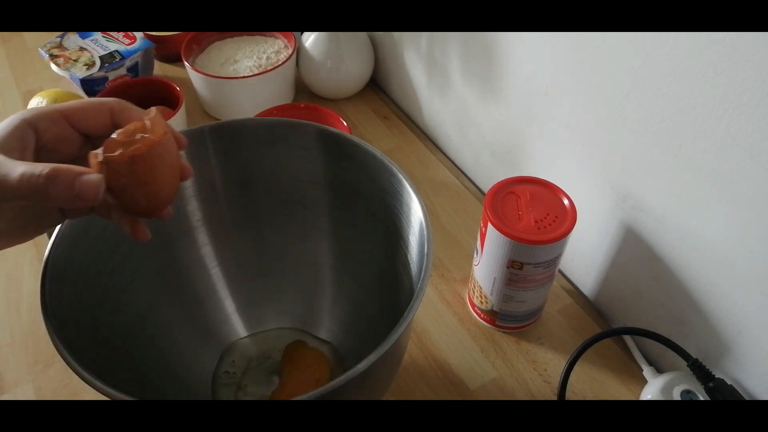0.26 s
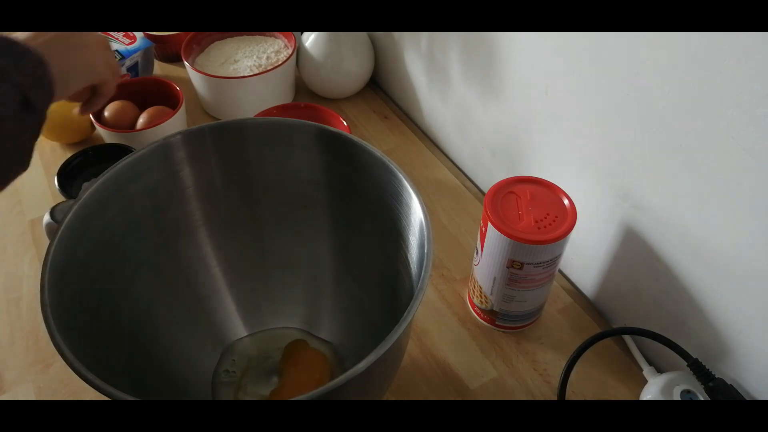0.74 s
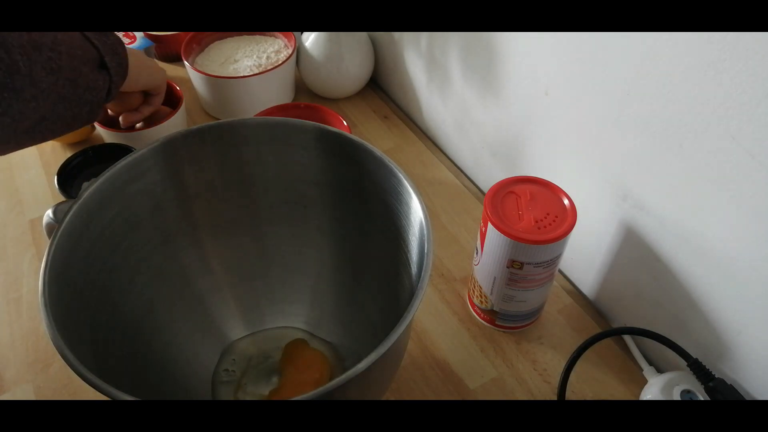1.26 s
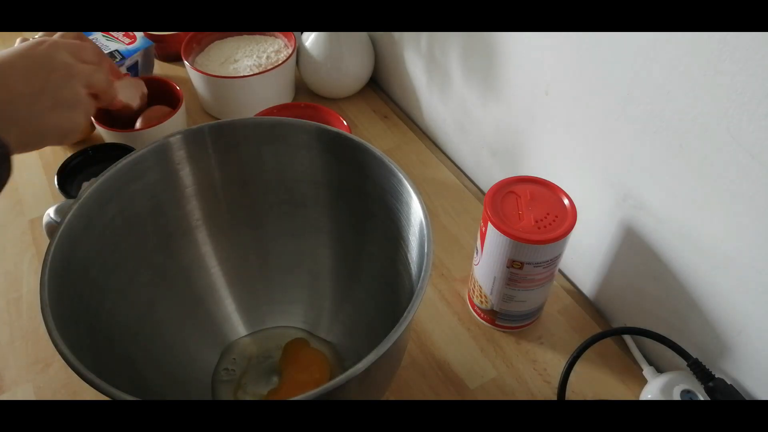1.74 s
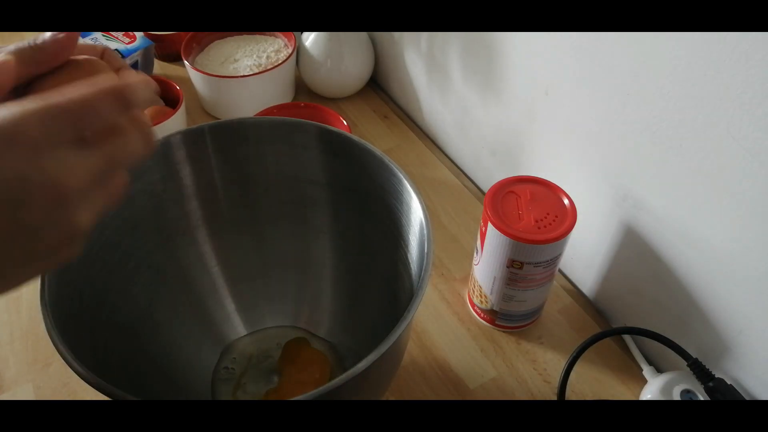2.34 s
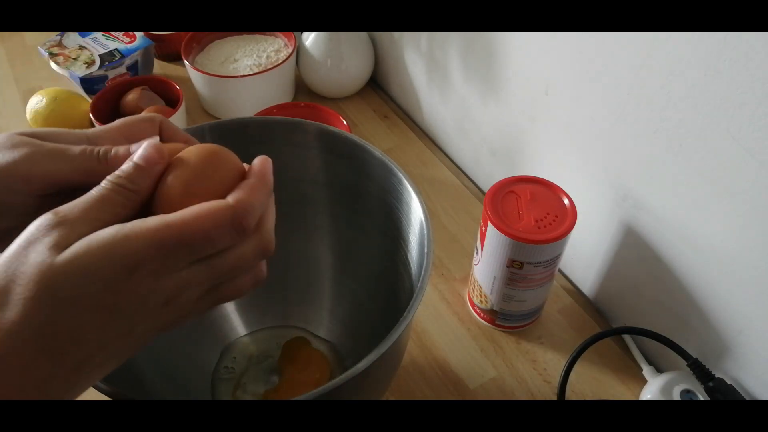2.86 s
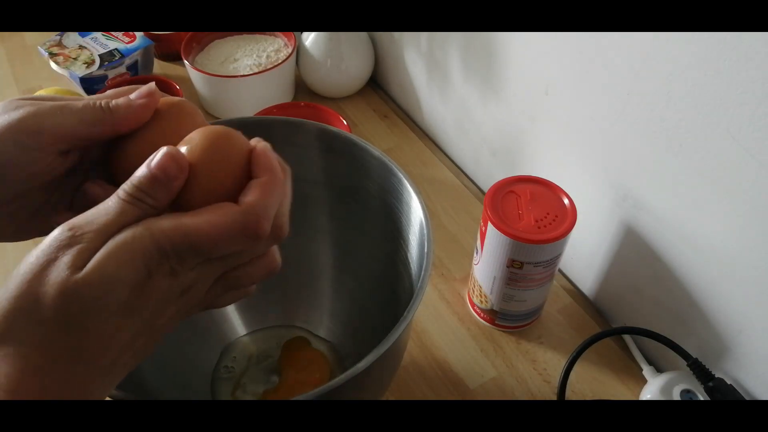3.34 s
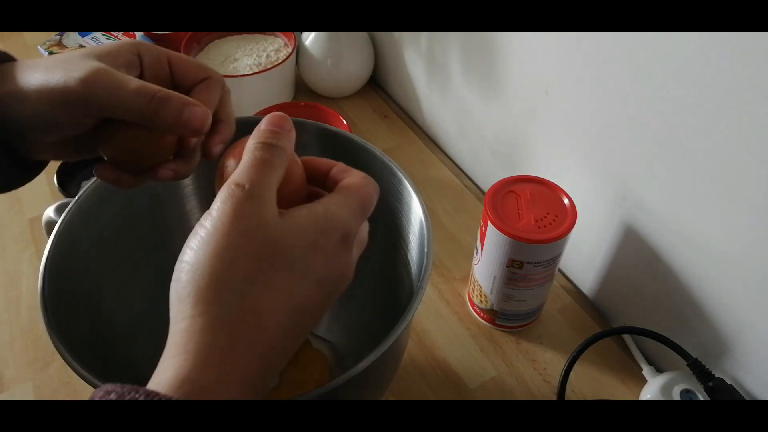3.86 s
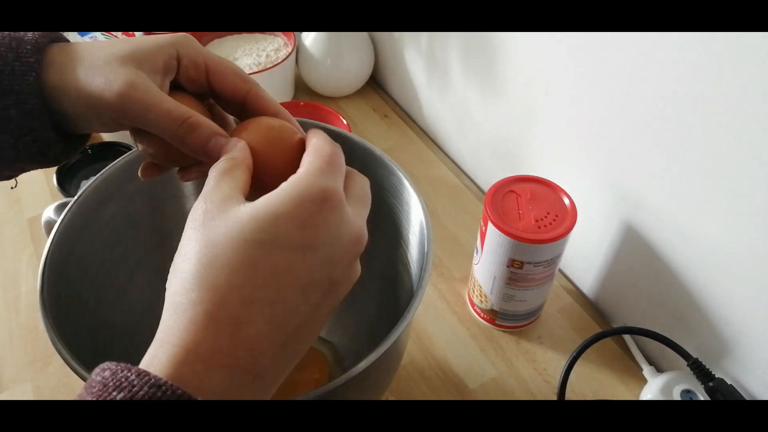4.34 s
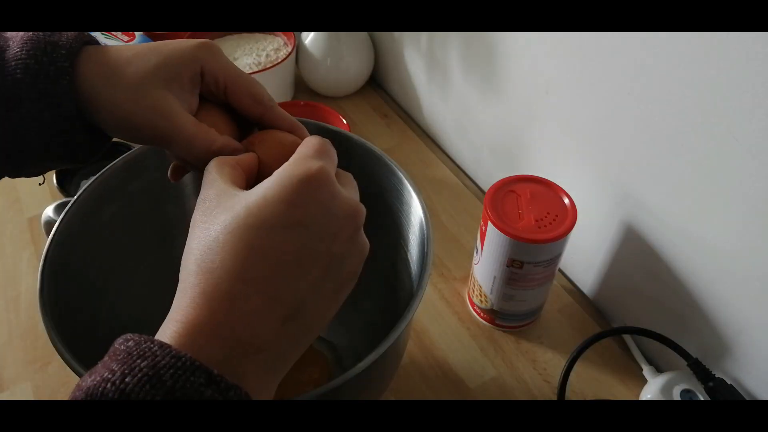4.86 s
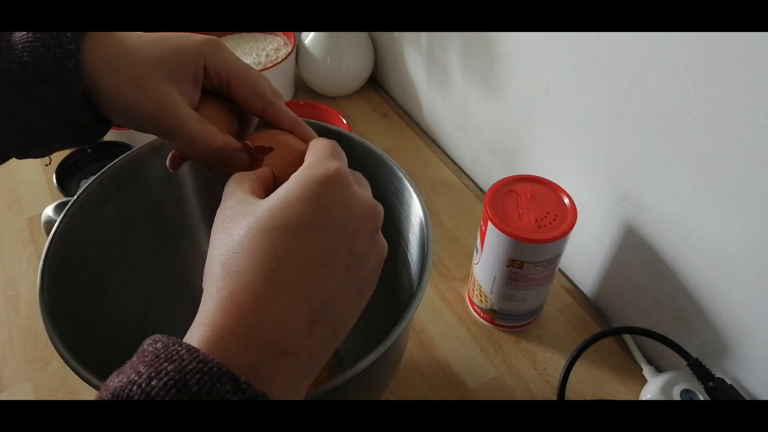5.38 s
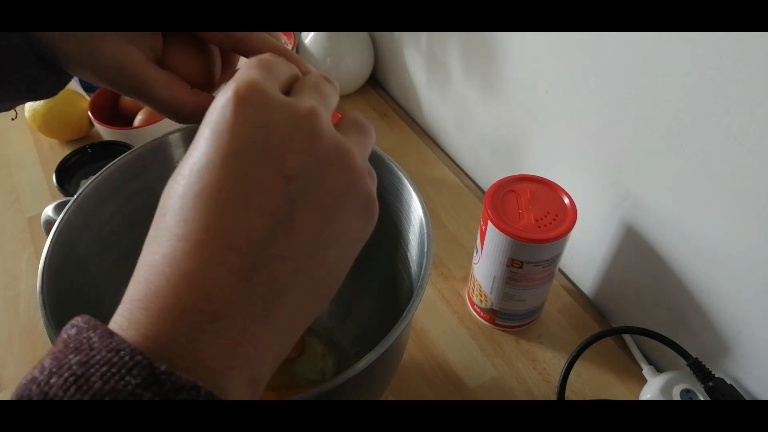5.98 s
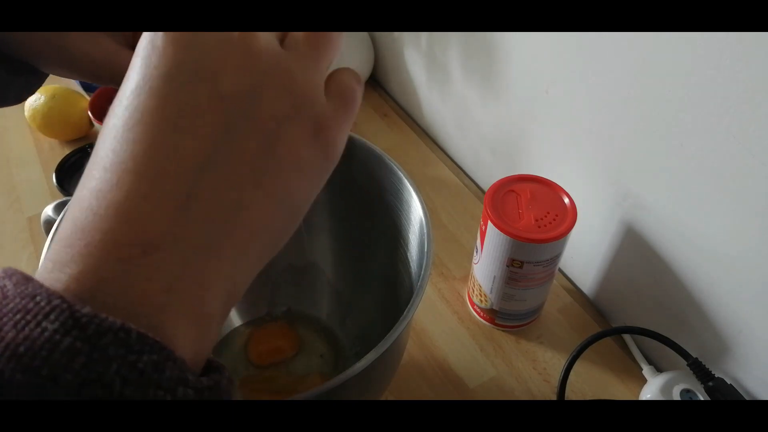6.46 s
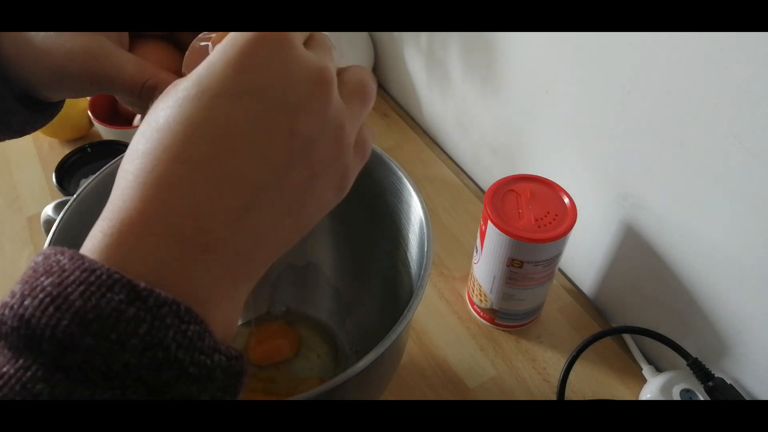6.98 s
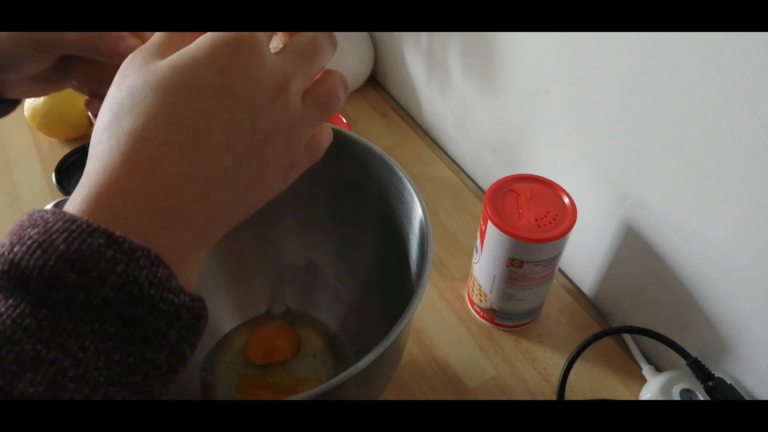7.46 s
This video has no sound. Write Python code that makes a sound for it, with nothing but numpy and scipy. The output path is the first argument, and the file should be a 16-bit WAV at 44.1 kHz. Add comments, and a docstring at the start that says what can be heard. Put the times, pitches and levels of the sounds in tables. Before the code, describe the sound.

In a small, quiet kitchen, things bump on a worktop and sleeves rustle. Handled eggs pop hollowly and clink in a china dish. Two eggs are tapped together four times, each tap louder, until one cracks. After a knock on a steel bowl's rim, thumbs pry the shell open with ticks, snaps and small wet pops. Everything is heard close up through a phone microphone, over a faint hum.

```python
"""Sleeves rustle and things bump on a worktop, over the faint hum of a small, quiet kitchen.
Handled eggs pop hollowly and clink in a china dish. Two are tapped together until one cracks, one is
knocked on a steel bowl's rim, and thumbs pry the shell open with ticks and wet pops.
Bumps and cracks are runs of tiny contacts with ringing modes; rubbing is grainy noise; pops are
ringing air pockets. All is heard close up, through a phone's two microphone ports."""
import sys
import numpy as np
from scipy import signal
from scipy.fft import rfft, irfft, next_fast_len
from scipy.io import wavfile

SR = 44100
rng = np.random.default_rng(int(sys.argv[2]) if len(sys.argv) > 2 else 0)


def file_out(sig):
    """Save sig as 16-bit WAV at sys.argv[1]."""
    # one column per channel
    cols = np.atleast_2d(sig).T
    # limit, then scale
    lim = np.clip(cols, -1, 1)
    pcm = np.round(lim * 32767).astype(np.int16)
    wavfile.write(sys.argv[1], SR, pcm)


N = 340452
T = np.arange(int(.7 * SR)) / SR  # time within one event, s


def undb(db):
    """Decibels to gain."""
    return 10 ** (np.asarray(db) / 20)


def unit(x):
    """Scale to a mean energy of 1 per channel."""
    return x / np.sqrt(np.mean(np.sum(x ** 2, axis=-1)))


def level(x, db):
    """Scale to an rms level."""
    return x * undb(db) / np.sqrt(np.mean(x ** 2))


def fade(t60_s):
    """Exponential decay, 60 dB down after t60_s."""
    return np.exp(-np.log(1000) * T / max(t60_s, 1e-3))


def pan(x, pan_db):
    """Place a sound; pan_db is left minus right."""
    return x * undb(np.array([[pan_db], [-pan_db]]) / 2)


def add(out, start_s, x, pan_db=0):
    """Mix an event in at its time and side."""
    i = max(int(start_s * SR), 0)
    out[:, i:i + len(T)] += pan(x, pan_db)[:, :N - i]


def colour(x, points):
    """Causal filter through (Hz, dB) points, built from the cepstrum."""
    size = 2 * next_fast_len(x.shape[-1])
    hz, db = np.transpose(points)
    bins_hz = np.maximum(np.arange(size // 2 + 1) * SR / size, 1)
    gain = undb(np.interp(np.log(bins_hz), np.log(hz), db))
    cepstrum = irfft(np.log(gain))
    cepstrum[1:size // 2] *= 2
    cepstrum[size // 2 + 1:] = 0
    return irfft(rfft(x, size) * np.exp(rfft(cepstrum)))[..., :x.shape[-1]]


def band(x, hz, width_hz):
    """One resonance."""
    return signal.lfilter(*signal.iirpeak(min(hz, SR / 2 - 1), hz / width_hz, fs=SR), x)


def through(x, response, size=len(T)):
    """Convolve with a response and cut to size."""
    return signal.fftconvolve(np.atleast_2d(x), response, axes=-1)[:, :size]


def diffuse(size, alike_hz=560):
    """Noise from all sides: the bass is the same at both ports, the treble unrelated."""
    mid, side = rfft(rng.standard_normal((2, size)))
    hz = np.arange(len(mid)) * SR / size
    alike = np.exp(-(hz / alike_hz) ** 2)
    return irfft(mid * np.sqrt(1 + alike) + side * np.sqrt(1 - alike) * np.array([[1], [-1]]), size)


def ring(modes):
    """Decaying modes; higher ones reach the two ports further out of step."""
    out = 0
    for hz, db, t60_s in modes:
        phase = rng.uniform(-1.8, 1) * min(hz / 700, 1.5) * np.array([[1], [-1]])
        out = out + undb(db) * fade(t60_s) * np.sin(2 * np.pi * hz * T + phase)
    return unit(out)


def contacts(decay_s, per_s, first_touch, swell_s):
    """A first touch, then random contacts that build up and die away."""
    hits = rng.standard_normal(len(T)) * (rng.random(len(T)) < per_s / SR)
    push = hits * np.exp(-T / max(decay_s, 3e-4)) * (1 - np.exp(-T / max(swell_s, 1e-4)))
    push[0] = first_touch
    return unit(push)


def room_tail(swell_s, low_t60_s=0.37, top_t60_s=0.32):
    """Response of a small hard room, whose treble dies first."""
    noise = diffuse(len(T))
    low = signal.sosfilt(signal.butter(2, 1800, fs=SR, output="sos"), noise)
    tail = low * fade(low_t60_s) + (noise - low) * fade(top_t60_s)
    return unit(tail * (1 - np.exp(-T / swell_s)))


def kitchen(x, wet_db):
    """A sound plus its room reverberation."""
    return x + undb(wet_db) * through(x, room_tail(swell_s=0.006))


def scatter(push, near_t60_s, wet_db):
    """Contacts set off dense reflections: short ones from close by, then the room."""
    tail = room_tail(swell_s=0.11)
    energy = np.maximum(through(push ** 2, fade(near_t60_s)[None] ** 2), 0)
    return unit(diffuse(len(T)) * np.sqrt(energy)) + undb(wet_db) * tail


def strokes(rows):
    """Gain of rubbing strokes: each swells smoothly, holds and dies away."""
    t, power = np.arange(N) / SR, 0
    for start_s, rise_s, hold_s, t60_s, db in rows:
        swell = np.sin(np.pi / 2 * np.clip((t - start_s) / rise_s, 0, 1)) ** 2
        release = np.exp(-np.log(1000) * np.maximum(t - start_s - rise_s - hold_s, 0) / t60_s)
        power = power + (swell * release * undb(db)) ** 2
    return np.sqrt(power)


# Room air. Each row: frequency in Hz, relative density in dB.
AIR_SPECTRUM = [(25, -3.5), (45, -3), (90, 0), (180, 1), (280, -14), (370, -3.5), (460, -16), (640, -10.5),
                (850, -12), (1500, -15.5), (2200, -23), (3200, -26.5), (6000, -31), (15000, -32)]
# Hum envelope. Each row: time in seconds, relative level in dB.
HUM_LEVELS = [(0, -66), (2.8, -65), (3.6, -68), (4.1, -64), (4.5, -60), (5.2, -67), (7.72, -68)]


def room_tone(air_db=-58, hum_hz=551, hum_gain_db=-1, flutter_hz=567, flutter_db=-8):
    """Still air and a faint hum, as of a fridge; narrow noise beside the tone makes it flutter."""
    t = np.arange(N) / SR
    flutter = band(rng.standard_normal(N), flutter_hz, width_hz=35)
    flutter = band(flutter, flutter_hz, width_hz=35)
    hum = level(np.sin(2 * np.pi * hum_hz * t), 0) + level(flutter, flutter_db)
    times_s, levels_db = np.transpose(HUM_LEVELS)
    hum *= undb(np.interp(t, times_s, levels_db) + hum_gain_db)
    air = level(colour(diffuse(N), AIR_SPECTRUM), air_db)
    return air + pan(hum, pan_db=9)


def friction_grains(per_s=900, t60_s=0.017):
    """Fibres and skin slip in tiny catches, each a short burst of noise."""
    sizes = rng.uniform(-1.57, 1, N) * undb(2 * rng.exponential(size=N).clip(0, 2))
    catches = sizes * (rng.random(N) < per_s / SR)
    return through(catches, rng.standard_normal((2, len(T))) * fade(t60_s), N)


# Rubbing noise. Each row: frequency in Hz, relative density in dB.
RUB_SPECTRUM = [(300, -42), (1000, -20), (2000, -5.5), (2900, 0.5), (4500, 2.5), (8500, 4), (11000, -2.5),
                (15000, -3.5)]


def rubbing(grains, grain_db):
    """Smooth sliding hiss plus grains, at rms 1."""
    friction = level(diffuse(N), 0) + level(grains, grain_db)
    return level(colour(friction, RUB_SPECTRUM), 0)


# Each row: start, rise, hold and release t60 in seconds, level in dB.
SLEEVE_STROKES = [(0.03, 0.055, 0.018, 0.14, -47.5), (1.06, 0.058, 0.021, 0.7, -52.5),
                  (1.128, 0.0083, 0.0071, 0.3, -41.5), (1.33, 0.03, .02, 0.67, -62.5),
                  (1.516, .018, 0.022, .3, -51.5), (2.315, .03, 0.018, .4, -65),
                  (3.45, 0.019, 0.015, .3, -59.5), (3.70, 0.12, 0.018, 0.71, -50.5),
                  (3.87, 0.095, 0.088, .32, -47), (4.125, .03, 0.026, 0.14, -65),
                  (4.48, 0.071, 0.16, .3, -67.5), (6.54, .018, 0.01, 0.19, -62.5)]


def sleeves(grains):
    """Sleeves and skin rub in strokes, with a softened top."""
    rustle = colour(rubbing(grains, grain_db=-8), [(8000, 0), (13000, -4)])
    return rustle * strokes(SLEEVE_STROKES)


# Tick of a hard contact. Each row: frequency in Hz, relative density in dB.
TICK_SPECTRUM = [(200, 8), (2200, 7), (7000, 3), (15000, -6)]


def thud_spectrum(thud_db, bass_hz, treble_hz, tick_db, bass_db_per_oct=15.5, treble_db_per_oct=16):
    """A blow is flat between limits: light things lack bass, soft ones treble. A tick lies on top."""
    hz = np.geomspace(25, 16000, 60)
    below_oct = np.maximum(np.log2(bass_hz / hz), 0)
    above_oct = np.maximum(np.log2(hz / treble_hz), 0)
    flat_db = thud_db - 10 * np.log10(2 * treble_hz / SR)
    thud = flat_db - bass_db_per_oct * below_oct - treble_db_per_oct * above_oct
    tick_hz, shape_db = np.transpose(TICK_SPECTRUM)
    tick = tick_db + np.interp(np.log(hz), np.log(tick_hz), shape_db)
    return np.column_stack([hz, np.maximum(thud, tick)])


# Worktop with the bowl on it. Each row: frequency in Hz, relative level in dB, t60 in seconds.
WORKTOP_MODES = [(78.3, 10, 0.31), (113.5, 7.5, 0.28), (134.6, 2.5, 0.34), (166.4, -0.5, 0.38),
                 (218.3, 3, 0.23), (322.6, 2.5, 0.23), (429, -14, 0.23), (633, -9.5, 0.47),
                 (725, 3.5, 0.28), (866, -1, 0.16), (908, -6, 0.49), (977, 9, 0.14), (1091, -0.5, 0.27),
                 (1371, -2, 0.43), (1655, -12, 0.47), (2860, 12.5, 0.087), (2860, -1, 0.49)]
# Blows on worktop, bowl and cupboards. Each row: start in seconds, thud in relative dB, bass and treble
# limits in Hz, tick in relative dB, boom in Hz, boom in dB, rattle decay in seconds, pan in dB.
BUMP_EVENTS = [(0.041, -38.5, 49.7, 950, -49.5, 59.2, -29, 0.022, -3),
               (0.085, -30, 70, 1020, -35.5, 63, -29, 0.034, -.5),
               (0.133, -32.5, 90, 413, -53, 122.5, -26, 0.044, -2.5),
               (0.205, -18.5, 460, 915, -43.5, 658, -20.5, 0.023, -2.5),
               (0.232, -36.5, 60, 203, -52, 81.6, -34, 0.027, -5.5),
               (0.266, -29, 473, 790, -60, 689, -25.5, 0.088, -1.5),
               (0.39, -35.5, 140, 750, -80, 684, -44.5, 0.11, -4),
               (0.509, -39.5, 112, 514, -75, 128, -47, 0.14, -5.5),
               (0.655, -42.5, 133, 432, -72, 131, -45.5, 0.02, -6),
               (1.349, -37.5, 456, 865, -51.5, 724, -54, 0.041, -4.5),
               (1.586, -18.5, 125, 816, -36.5, 211.4, -25, 0.034, -2),
               (1.88, -33, 133, 860, -40.5, 116, -41.5, 0.02, 2.5),
               (1.982, -45, 173, 327, -58, 248, -46, .045, -1),
               (2.251, -41.5, 178, 374, -83, 211, -38.5, 0.036, 4),
               (3.007, -48.5, 400, 910, -59, 183, -63, 0.039, -1),
               (4.676, -24, 99, 1300, -36, 319, -32, 0.046, 3),
               (5.743, -48.5, 120, 294, -65, 89, -56, 0.0094, 2.5),
               (6.589, -22.5, 262, 1670, -40, 329, -43.5, 0.021, -4.5),
               (7.266, -30.5, 189, 1160, -40, 108.9, -41, .025, -2.5)]


def bumps(thud_gain_db=-3, modes_db=-9, boom_t60_cycles=32):
    """Each object booms and rattles to rest; the wood answers with a dead thud and longer modes."""
    out = np.zeros((2, N))
    for start_s, thud_db, bass_hz, treble_hz, tick_db, boom_hz, boom_db, rattle_s, pan_db in BUMP_EVENTS:
        swell_s = 0.0014 * undb(-.7 * thud_db)  # gentle touches build up more slowly
        swell = 1 - np.exp(-T / swell_s)
        push = contacts(rattle_s, per_s=1100, first_touch=0.85, swell_s=swell_s)
        blow = scatter(push, near_t60_s=0.055, wet_db=-9)
        blow += undb(modes_db) * unit(ring(WORKTOP_MODES) * swell)
        spectrum = thud_spectrum(thud_db, bass_hz, treble_hz, tick_db)
        thud = colour(unit(blow), spectrum) * undb(thud_gain_db)
        boom = ring([(boom_hz, 0, boom_t60_cycles / boom_hz)])
        boom = unit(boom * swell) * undb(boom_db)
        add(out, start_s, (thud + boom) * np.sqrt(0.032 * SR), pan_db)
    return out


# Each row: start in seconds, level in dB, starting pitch in Hz, tail t60 in seconds.
POP_EVENTS = [(1.252, -40.5, 1310, 0.042), (1.315, -44, 1740, 0.11), (1.564, -24.5, 860, 0.21),
              (5.271, -40.5, 2450, 0.07), (5.394, -40, 1380, 0.13), (6.115, -37.5, 1860, 0.092),
              (6.181, -48.5, 1600, 0.066), (6.373, -55.5, 2770, 0.037), (6.43, -56, 2030, 0.083),
              (6.785, -49, 1770, 0.12), (6.81, -43.5, 1630, 0.14)]


def pops(glide=0.055, ring_share=0.2, swell_s=0.0017):
    """Hollow, wet pops of handled eggs: small air pockets ring briefly and rise a little in pitch."""
    out = np.zeros((2, N))
    for start_s, db, hz, t60_s in POP_EVENTS:
        pitch_hz = hz * (1 + glide * (1 - fade(t60_s)))
        pocket = np.sin(2 * np.pi * np.cumsum(pitch_hz) / SR) * fade(t60_s * ring_share)
        tail = diffuse(len(T)) * fade(t60_s) * (1 - np.exp(-T / swell_s))
        pop = kitchen(unit(through(pocket, tail)), wet_db=-7)
        add(out, start_s, pop * np.sqrt(0.0061 * SR) * undb(db))
    return out


# China dish. Each row: frequency in Hz, relative level in dB, t60 in seconds.
DISH_MODES = [(1547, 13.5, 0.19), (1704, 11, 0.14), (2785, 9, 0.064), (3270, -8, 0.49), (3450, -1, 0.052),
              (4740, -10, .15), (5180, 3.5, 0.11), (5300, -4, 0.07), (8780, 13, 0.035)]
# Each row: start in seconds, level in dB, brightness in dB per octave.
CLINK_EVENTS = [(1.88, -30, 6), (1.983, -36.5, 1.5)]


def clinks(scrape_db=4):
    """An egg lifted from the dish nudges the china; a sharper touch favours the higher modes."""
    out = np.zeros((2, N))
    for start_s, db, db_per_oct in CLINK_EVENTS:
        modes = [(hz, mode_db + db_per_oct * np.log2(hz), t60_s) for hz, mode_db, t60_s in DISH_MODES]
        china = ring(modes)
        scrape = unit(band(diffuse(len(T)), hz=9500, width_hz=7600) * fade(0.059))
        clink = unit(kitchen(china + undb(scrape_db) * scrape, wet_db=-4))
        add(out, start_s, clink * np.sqrt(0.01 * SR) * undb(db))
    return out


def fractures(crunch_s, first_touch, near_db, near_t60_s):
    """A run of tiny fractures: returns it direct, and with reflections off hands, bowl and room."""
    push = contacts(crunch_s, per_s=5100, first_touch=first_touch, swell_s=0.0012)
    direct = np.array([push, np.roll(push, 10)])  # the left port hears it first
    return direct, direct + undb(near_db) * scatter(push, near_t60_s, wet_db=-9)


# Eggshell. Each row: multiple of the ring frequency, relative level in dB, t60 in seconds.
SHELL_MODES = [(.97, -7, 0.027), (1, -9, 0.12), (1.041, 1.5, 0.011), (1.09, -2, 0.031), (1.2, 8, 0.018),
               (1.3, 13.5, 0.005), (1.65, 17, 0.004)]


def eggshell(direct, crack, ring_hz, width_hz, modes_db, edge_db, tick_db=5):
    """A crack rings the shell's broad resonance and its modes, under a bright edge."""
    broad = unit(band(band(crack, ring_hz, width_hz), ring_hz, width_hz))
    modes = ring([(ring_hz * ratio, db, t60_s) for ratio, db, t60_s in SHELL_MODES])
    shell = broad + undb(modes_db) * unit(through(crack, modes))
    shell = unit(colour(shell, [(4200, -18), (4750, 3)]))  # little rings below the lowest mode
    edge = colour(crack + undb(tick_db) * direct, [(3800, -33), (4800, 13.5), (9000, 25), (15000, 16)])
    return unit(shell + undb(edge_db) * unit(edge))


def egg_body(crack, crunch_s, bass_db, cycles_per_crunch=3.5):
    """The egg's dull body answers a crack; a shorter crunch sounds higher."""
    top_hz = np.clip(cycles_per_crunch / crunch_s, 1000, 3200)
    shape = [(80, bass_db - 8), (350, bass_db), (700, 0), (top_hz, -3), (2 * top_hz, -17), (16000, -35)]
    return unit(colour(crack, shape))


# Each row: start in seconds, level in dB, shell ring in Hz, body in relative dB,
# crunch decay in seconds, pan in dB.
TAP_EVENTS = [(2.8610, -30.5, 4950, -5.5, 0.011, 0.5), (3.1275, -29, 5020, -9, 0.0025, -2),
              (3.3185, -24, 5230, -0.5, 0.0016, -.5), (3.5155, -20, 6110, -7.5, 0.00097, -2)]


def egg_taps(firm_db=-27.5, edge_db_per_db=1.8):
    """Egg strikes egg, sounding shell and body; taps softer than firm_db have less edge."""
    out = np.zeros((2, N))
    for start_s, db, ring_hz, body_db, crunch_s, pan_db in TAP_EVENTS:
        direct, crack = fractures(crunch_s, first_touch=0.45, near_db=-0.5, near_t60_s=0.19)
        edge_db = -1 + edge_db_per_db * min(db - firm_db, 0)
        tap = eggshell(direct, crack, ring_hz, width_hz=1180, modes_db=-2, edge_db=edge_db)
        tap += undb(body_db) * egg_body(crack, crunch_s, bass_db=-9.5)
        add(out, start_s, tap * np.sqrt(0.0013 * SR) * undb(db), pan_db)
    return out


# Each row: start, rise, hold and release t60 in seconds, level in dB.
THUMB_STROKES = [(4.77, 0.24, 0.28, .55, -48), (5.26, 0.063, 0.11, 0.42, -53.5),
                 (5.45, 0.043, 0.059, 0.24, -57), (5.82, 0.031, 0.025, .25, -59),
                 (5.895, 0.018, 0.011, 0.51, -49), (6.0, 0.088, 0.11, .45, -48.5),
                 (6.56, 0.14, 0.2, 0.56, -53), (7.25, .15, .05, .6, -53)]


def prying(grains, splinter_db=-6, splinters_per_s=70, splinter_t60_s=0.019):
    """Thumbs press and slide on the shell while small splinters break off."""
    thumbs = rubbing(grains, grain_db=-4)
    breaks = rng.uniform(0, 1, N) * (rng.random(N) < splinters_per_s / SR)
    splinters = through(breaks, diffuse(len(T)) * fade(splinter_t60_s), N)
    splinters = level(colour(splinters, [(2000, -18), (5500, 0)]), splinter_db)
    return (thumbs + splinters) * strokes(THUMB_STROKES)


# Each row: start in seconds, level in dB, shell ring in Hz, body in relative dB,
# crunch decay in seconds, pan in dB.
SNAP_EVENTS = [(4.834, -44.5, 9500, 2, 0.0013, 6), (5.015, -40.5, 6400, -8, 0.0011, 9),
               (5.156, -38, 6660, -3.5, 0.0029, 13), (5.247, -29.5, 6280, -7, 0.00069, 5.5),
               (5.272, -40, 5500, -25, 0.0019, 10), (5.328, -44, 7000, -11, 0.0011, 15),
               (5.363, -38.5, 8360, -9, .001, 6), (5.397, -35.5, 7250, -36, 0.0018, 11),
               (5.531, -37, 5060, -6, 0.00067, 7.5), (5.541, -42, 5120, -20, 0.0019, 11),
               (5.7445, -38, 9300, -30, 0.0013, 6), (5.826, -42.5, 9700, -30, 0.013, 14),
               (6.116, -41, 6100, -6, .001, 14), (6.1775, -27, 6770, -31, .0004, 2),
               (6.191, -31, 6400, -33, 0.0027, 6), (6.2275, -30.5, 6200, -7, .0004, 0),
               (6.303, -36, 6600, 1, 0.0017, 6.5), (6.316, -35, 7300, -21, 0.0076, 1),
               (6.760, -40.5, 5860, 1.5, 0.0016, -6), (7.148, -47, 6500, -5.5, 0.00091, 8)]


def shell_snaps():
    """Shell snaps under the thumbs: a sharp first break, strong near reflections, no bass."""
    out = np.zeros((2, N))
    for start_s, db, ring_hz, body_db, crunch_s, pan_db in SNAP_EVENTS:
        direct, crack = fractures(crunch_s, first_touch=3.2, near_db=9, near_t60_s=0.082)
        snap = eggshell(direct, crack, ring_hz, width_hz=2400, modes_db=-2.5, edge_db=-6)
        snap += undb(body_db) * egg_body(crack, crunch_s, bass_db=-88)
        add(out, start_s, snap * np.sqrt(0.0013 * SR) * undb(db), pan_db)
    return out


def scene():
    """All sounds around the bowl."""
    impacts = egg_taps() + shell_snaps() + bumps() + clinks() + pops()
    grains = friction_grains()
    return impacts + sleeves(grains) + prying(grains) + room_tone()


# Microphone ports. Each row: frequency in Hz, left gain in dB, right gain in dB.
PORT_RESPONSE = [(1070, -2.5, -3), (3200, 7, 8), (4010, 1, 2), (5450, 7, 12.5), (5960, 3.5, 15.5),
                 (7840, 3, 1), (8360, 10, -10), (11600, -2.5, -3), (16200, -6, -3)]


def record(dry, top_hz=15700):
    """Each port has its own treble resonance; the top is cut steeply."""
    ports = np.array(PORT_RESPONSE)
    left = colour(dry[0], ports[:, [0, 1]])
    right = colour(dry[1], ports[:, [0, 2]])
    lowpass = signal.ellip(8, .2, 70, top_hz, fs=SR, output="sos")
    return signal.sosfilt(lowpass, np.array([left, right]))


dry = scene()
out = record(dry)
file_out(out)
```